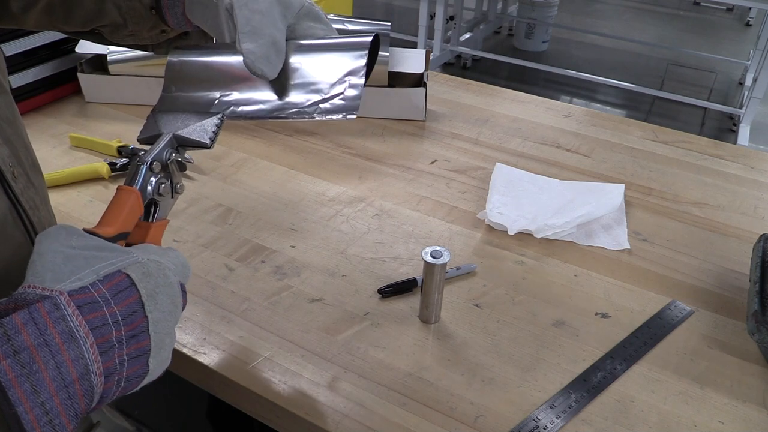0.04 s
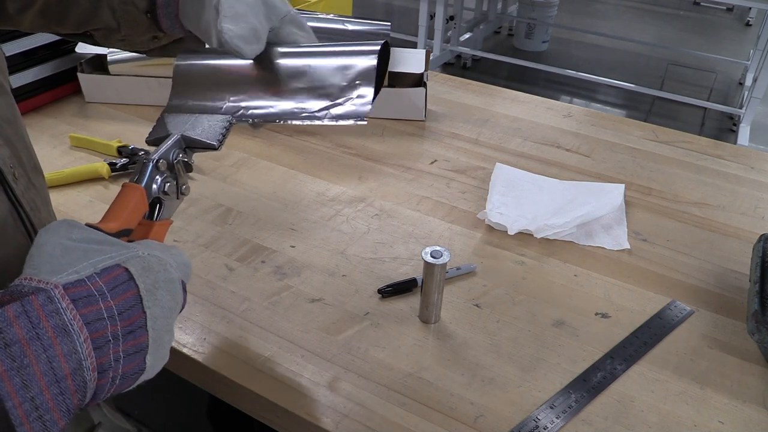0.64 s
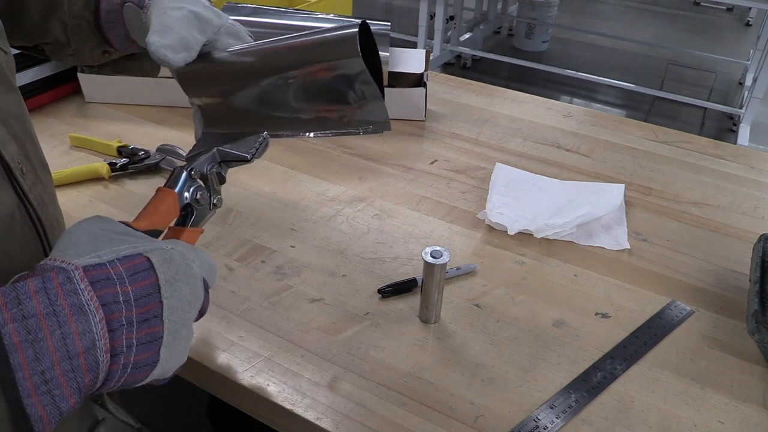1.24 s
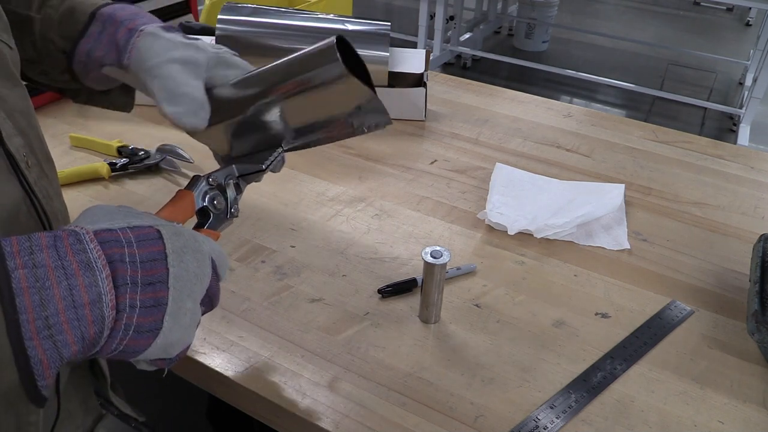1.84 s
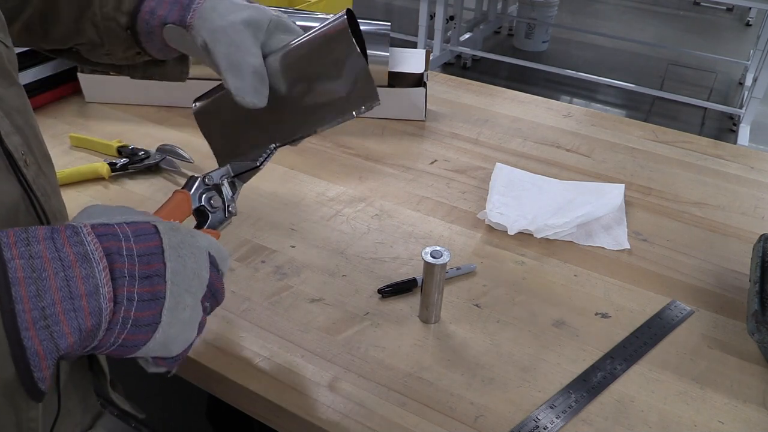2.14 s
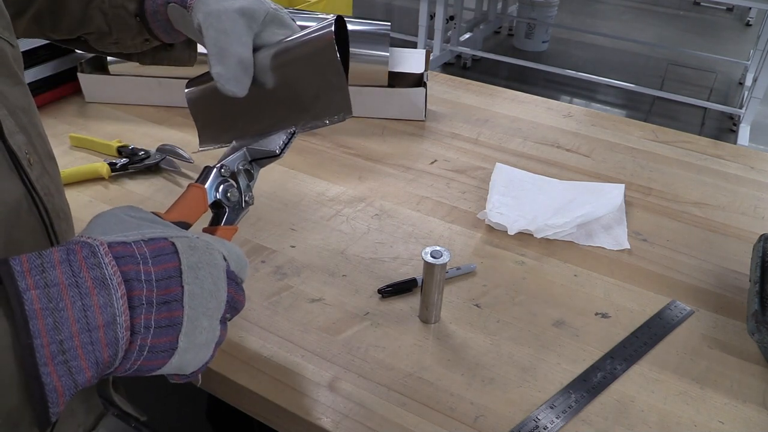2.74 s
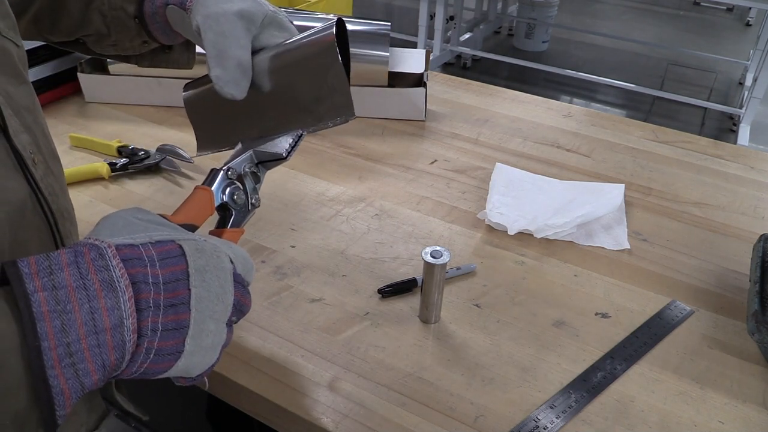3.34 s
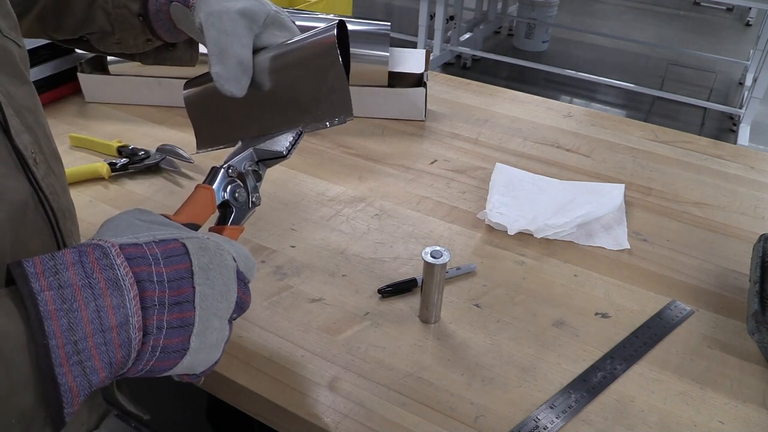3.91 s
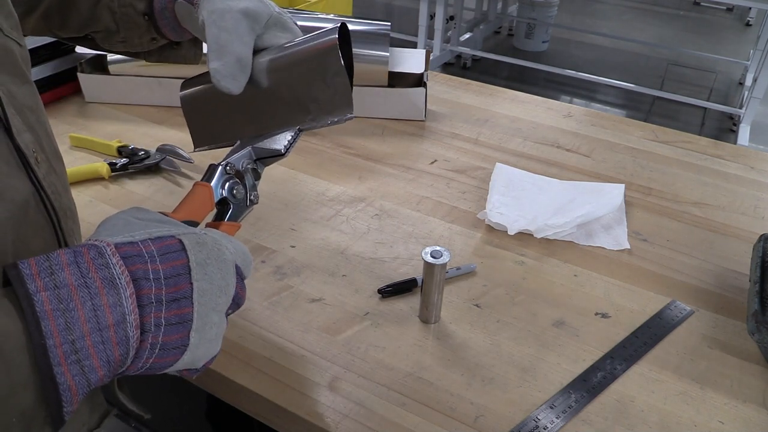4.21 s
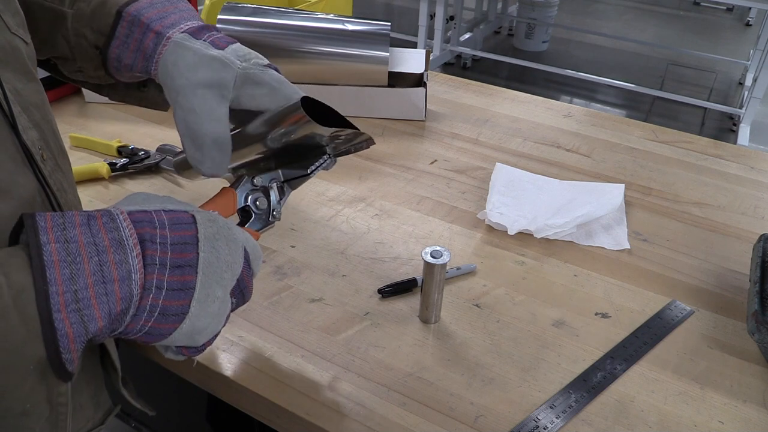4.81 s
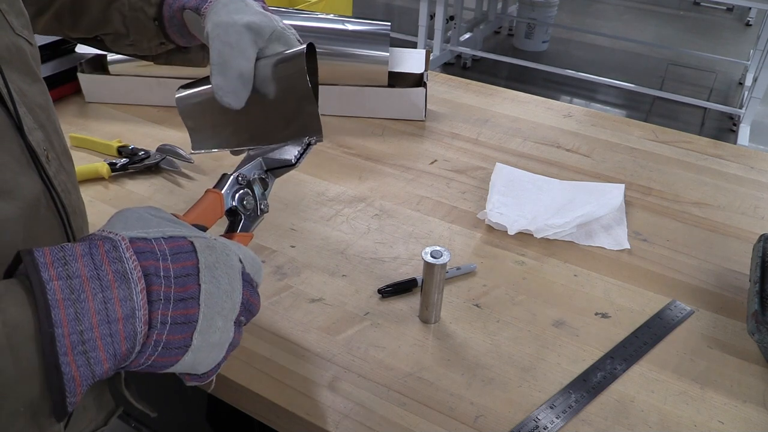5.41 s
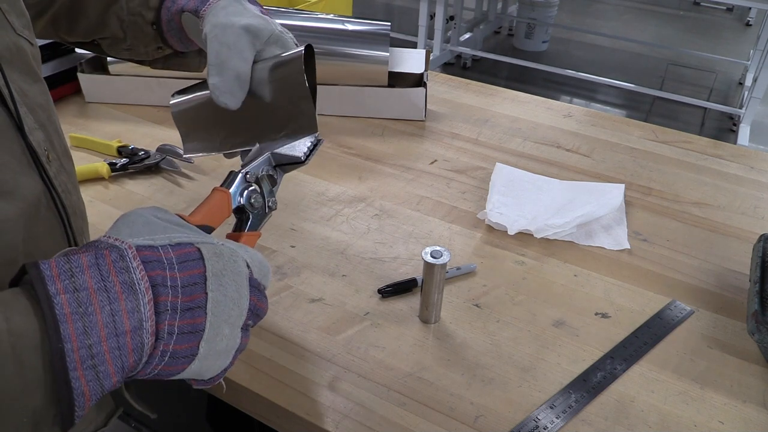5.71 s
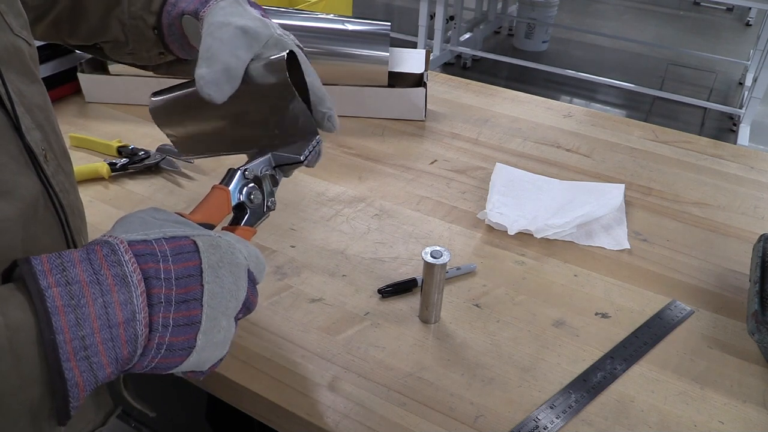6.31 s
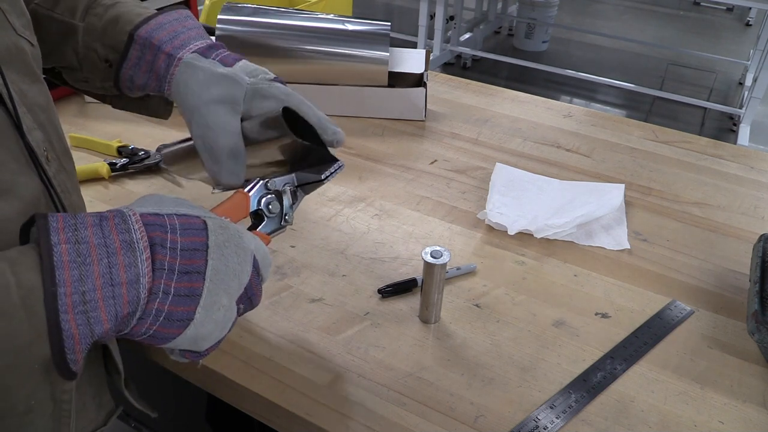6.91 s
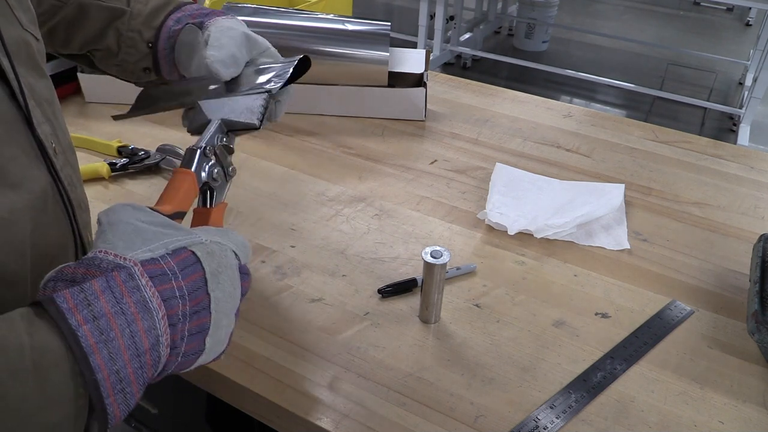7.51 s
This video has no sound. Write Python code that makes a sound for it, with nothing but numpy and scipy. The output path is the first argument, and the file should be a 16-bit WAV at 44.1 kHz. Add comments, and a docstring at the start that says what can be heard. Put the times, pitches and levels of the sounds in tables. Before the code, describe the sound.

Irregular metallic snaps, crinkles and brief sliding hisses of thin foil being bent with pliers, with gloves rumbling softly in a quiet lab.

```python
"""Gloved hands fold the edge of a thin steel foil pouch with flat-jawed pliers in a large lab. From the start,
the ventilation hums, sleeves and gloves rumble, and the held foil crinkles faintly. At 0.4 s the foil begins to
buckle in short, ringing snaps; some hard ones jolt the pliers with a thud. From 2.3 s a glove slides over the
foil with a soft hiss; after a loud double snap at 2.5 s, the snaps pause. They run again from 3.4 s to 7.2 s,
with more sliding around 5.4 s. It is almost mono."""
import sys
import numpy as np
from scipy import signal
from scipy.fft import rfft, irfft, next_fast_len
from scipy.io import wavfile
from scipy.ndimage import map_coordinates

SR = 44100
rng = np.random.default_rng(int(sys.argv[2]) if len(sys.argv) > 2 else 0)


def to_wav(sig):
    """Store sig (one row per channel, or 1-D mono) as 16-bit WAV at the path in sys.argv[1].

    Samples outside -1..1 are clipped; the rate is SR.
    """
    pcm = np.clip(np.atleast_2d(sig), -1, 1) * 32767
    pcm = np.round(pcm).astype(np.int16)
    wavfile.write(sys.argv[1], SR, pcm.T)  # frames by channels


N = 332955
TIME = np.arange(N) / SR

# The tone colour of the whole foil sheet, weak below 800 Hz. Columns: frequency_hz, relative_db
FOIL_COLOUR = [(100, -41), (300, -18.5), (500, -17), (740, -10), (920, 7), (1100, 13), (1450, 7),
               (1900, 1.5), (3700, 0.5), (5600, -9.5), (7400, -19.5), (9800, -28.5), (12000, -36.5),
               (15000, -43.5)]


def from_db(db):
    """Turn decibels into a number to multiply a sound by."""
    return 10 ** (np.asarray(db) / 20)


def rms_one(x):
    """Scale a sound so that its average level (rms) is 1."""
    return x / np.sqrt(np.mean(x ** 2) + 1e-20)


def energy_one(x):
    """Scale a sound so that its total energy is 1."""
    return x / np.sqrt(np.sum(x ** 2) + 1e-20)


def at_hz(points, hz):
    """Look up a tone colour in dB, joining its points smoothly on an octave scale."""
    knots, levels = np.transpose(points)
    return np.interp(np.log(hz), np.log(knots), levels)


def coloured(x, db_at):
    """Turn each frequency up or down by db_at(hz)."""
    size = 2 * next_fast_len(len(x) // 2 + 2048)
    hz = np.maximum(np.arange(size // 2 + 1) * SR / size, 1)
    cepstrum = irfft(np.log(from_db(db_at(hz))))
    # minimum phase: the filter rings only after a sound, never before it
    cepstrum[1:size // 2] *= 2
    cepstrum[size // 2 + 1:] = 0
    return irfft(rfft(x, size) * np.exp(rfft(cepstrum)))[:len(x)]


def noise(colour):
    """Steady noise with the given tone colour and an average level of 1."""
    return rms_one(coloured(rng.standard_normal(N), lambda hz: at_hz(colour, hz)))


def drift(turns_per_s):
    """A value that wanders at random around 0, mostly within 1 either way."""
    return np.interp(TIME * turns_per_s, np.arange(4096), rng.standard_normal(4096))


def fade(t, ring_s):
    """Die away by 60 dB in ring_s seconds."""
    return np.exp(-np.log(1000) * t / max(ring_s, 1e-3))


def keep_band(x, hz, kind):
    """Let through the "low" side of hz, the "high" side, or the "band" between two frequencies."""
    return signal.sosfilt(signal.butter(2, hz, kind, fs=SR, output="sos"), x)


def effort():
    """Busier hands make the rumble, rustle and crinkling louder."""
    # How hard the hands work. Columns: time_s, gain_db
    hand_work = [(0, -5), (1.1, 2.5), (1.85, -2), (2.4, 4.5), (3.2, -5.5), (3.8, -2), (4.45, 0),
                 (5.0, -5.5), (5.4, 3), (7.1, 0.5), (7.55, -1.5)]
    return from_db(np.interp(TIME, *np.transpose(hand_work)))


def hand_rumble(base_db=-59, lumpy_db=3.0):
    """Cloth and leather never quite rest; their lumpy rumble swells as the hands shift or are jolted."""
    # Swells as a glove or sleeve shifts. The one at 0.94 s is instead the low thump of the hard snap
    # at 0.95 s jolting the pliers and hand. Columns: middle_s, level_db, length_s
    swells = [(0.292, -54, 0.029), (0.64, -54.5, .1), (0.94, -44.5, 0.042), (1.256, -57, 0.37),
              (1.602, -51, 0.067), (2.017, -52, 0.06), (2.17, -53, 0.051), (2.397, -49.5, 0.071),
              (2.58, -55.5, 0.27), (3.39, -52.5, 0.027), (3.51, -53.5, 0.13), (4.091, -56.5, 0.25),
              (4.488, -50, 0.07), (4.748, -56, 0.3), (5.115, -50, 0.09), (5.466, -49.5, 0.088),
              (6.082, -59, 0.2), (6.683, -54.5, 0.092), (6.924, -52, 0.17), (7.136, -44, 0.036),
              (7.25, -52, 0.11)]
    # The tone colour of the rumble. Columns: frequency_hz, relative_db
    rumble_colour = [(20, -31), (40, -28.5), (62, -19), (110, -5), (160, -5.5), (210, 4), (300, -2),
                     (480, -10), (700, -9), (1500, -33), (8000, -70)]
    swell_power = sum(from_db(db) ** 2 * np.exp(-np.minimum((2 * (TIME - middle_s) / length_s) ** 2, 20))
                      for middle_s, db, length_s in swells)
    level = np.sqrt((from_db(base_db) * effort()) ** 2 + swell_power)
    return noise(rumble_colour) * level * from_db(lumpy_db * drift(30))


def air_and_rustle(air_db=-61.5, rustle_db=-60, lumpy_db=1):
    """Steady air from the ventilation and the light rustle of gloves share one soft rushing noise."""
    # The tone colour of both. Columns: frequency_hz, relative_db
    air_colour = [(200, -2.5), (500, -4.5), (620, 9.5), (760, -0.5), (950, 6.5), (1500, -2), (2200, -8.5),
                  (3500, -16.5), (5000, -27), (6500, -34.5), (9000, -56), (15000, -68.5)]
    rustle = effort() * from_db(rustle_db + lumpy_db * drift(17))
    return noise(air_colour) * np.hypot(from_db(air_db), rustle)


def fan_hum(waver_radians=0.94):
    """The ventilation fan hums with three slightly wavering tones."""
    # The fan's tones. Columns: pitch_hz, level_db
    tones = [(220.7, -69.5), (393, -68.5), (603, -72)]
    return sum(from_db(db) * np.sqrt(2) * np.sin(2 * np.pi * hz * TIME + waver_radians * drift(25))
               for hz, db in tones)


def sheet_ring(t, ring_s, low_hz=1800, top_hz=7500, spread_s=0.00031):
    """Bending waves spread over the sheet and ring at countless pitches; the low ones last longer."""
    # Columns: edge_hz, kind, multiple of ring_s
    bands = [(low_hz, "low", 1.376), ([low_hz, top_hz], "band", 0.76), (top_hz, "high", 0.25)]
    ring = sum(keep_band(rng.standard_normal(len(t)), hz, kind) * fade(t, ring_s * life)
               for hz, kind, life in bands)
    return energy_one(ring * (1 - np.exp(-t / spread_s)))


def treble_edge(hz, edge_hz, steepness=14):
    """A soft contact makes almost no sound above edge_hz; this gives the drop in dB."""
    return -10 * np.log10(1 + (hz / edge_hz) ** steepness)


def crinkle(ticks_per_s=18, base_db=-68.5, uneven_db=3.5, ring_s=0.11, edge_hz=4500, size=6000):
    """The sheet gives tiny random ticks as the fingers flex it."""
    strengths = from_db(uneven_db * np.clip(rng.standard_normal(N), -2, 2))
    ticks = strengths * (rng.random(N) < ticks_per_s / SR)
    ringing = signal.fftconvolve(ticks, sheet_ring(np.arange(size) / SR, ring_s))[:N]
    ringing = coloured(ringing, lambda hz: at_hz(FOIL_COLOUR, hz) + treble_edge(hz, edge_hz))
    return from_db(base_db) * effort() * rms_one(ringing)


def buckle(run_ms, slips_per_s=2500, uneven_db=5.0, first_db=1.0, weaken_db=2.0, size=4096):
    """Foil gives way in a quick string of uneven slips, which weaken as the stress is spent."""
    chance, strength, sign = rng.random(size), rng.standard_normal(size), rng.choice([-1, 1], size)
    count = int(np.clip(run_ms * SR / 1000, 2, size))
    slips = chance[:count] < slips_per_s / SR
    slips[[0, -1]] = True
    slip_db = uneven_db * strength[:count] - weaken_db * np.linspace(0, 1, count)
    slip_db[0] = first_db
    return slips * sign[:count] * from_db(slip_db)


def bent(x, glide):
    """Bending the sheet shifts all its tones together, by `glide` times their pitch each second."""
    t = np.arange(len(x)) / SR
    return map_coordinates(x, [SR * np.abs(t + glide * t ** 2 / 2)], order=3)


def snaps(panel_octaves=0.12, crack=0.42, glide=0.74, gain_db=26.5, size=9000):
    """Each snap reshapes the sheet, so it rings afresh, and one panel (a patch of foil) stands out."""
    # The foil's snaps. Brightness is treble over bass; a sharp crease has a high edge, a soft bulge low.
    # Columns: start_s, relative_db, run_ms, ring_s, pitch_hz, bright_db, edge_hz
    snap_list = [(0.394, -51.5, 2.3, 0.045, 6440, 16, 6660), (0.465, -41.5, 2.74, 0.051, 4300, 11.5, 4350),
                 (0.569, -38, 1.35, 0.11, 2430, 9, 4260), (0.692, -33.5, 4, 0.12, 2750, 15, 5400),
                 (0.808, -29.5, 19.5, 0.19, 940, -6, 4900), (0.871, -18, 13.6, 0.18, 885, 1.5, 7400),
                 (0.881, -20.5, 7.4, 0.11, 2100, 4.5, 6000), (0.932, -29.0, 3.8, 0.087, 2170, 5, 5300),
                 (0.95, -16.5, 4, 0.076, 2400, 1, 8600), (0.979, -20, 18.7, 0.13, 856, -2, 7150),
                 (1.106, -36, 26.6, 0.15, 2390, 15, 6600), (1.179, -34, 4.3, 0.087, 2930, 12.5, 5800),
                 (1.217, -37, 1.1, 0.13, 858, -20, 3500), (1.388, -29, 8.7, 0.13, 930, -9, 13000),
                 (1.397, -20.5, 8.9, 0.13, 880, 3.5, 11700), (1.888, -43.5, 3.5, 0.21, 970, -24.5, 15000),
                 (1.991, -26, 2.75, 0.13, 3620, -6.5, 6300), (2.03, -34.5, 4.4, 0.113, 970, -20, 3500),
                 (2.067, -28, 10, 0.14, 2000, 11, 7500), (2.08, -19.5, 7.3, 0.12, 980, -1.5, 6000),
                 (2.142, -33, 5.1, 0.075, 1060, -9.5, 3500), (2.25, -33.5, 7.7, 0.13, 1130, -8, 10300),
                 (2.428, -40.5, 4.6, 0.19, 1154, -9, 6340), (2.529, -19, 2.5, 0.1, 1500, 2, 6700),
                 (2.536, -18.5, 4.5, 0.069, 2020, 12, 10900), (3.412, -26.5, 27.9, 0.17, 1400, 5.5, 8300),
                 (3.749, -35, 1.3, 0.067, 1275, -4.5, 5000), (3.785, -44, 3.0, 0.11, 4060, 5, 5400),
                 (3.859, -41, 3.4, 0.088, 2730, -4.5, 4600), (4.022, -30.5, 1, 0.18, 2890, 7.5, 10500),
                 (4.026, -21, 1.75, 0.064, 1520, 12, 10400), (4.097, -49, 2, 0.053, 5860, 30, 8400),
                 (4.225, -31.5, 2, 0.085, 3750, -8.5, 4300), (4.27, -21, 5.7, 0.21, 1000, 5.5, 7700),
                 (4.284, -18, 9.5, 0.18, 1120, -2.5, 4800), (4.376, -31.5, 8.4, 0.066, 1610, 2.5, 4800),
                 (4.407, -33, 5, 0.13, 980, -12, 5000), (4.546, -36, 3, 0.091, 2480, 15.5, 6000),
                 (4.599, -22.5, 20.5, 0.17, 1650, 8, 11000), (4.688, -38, 3.1, 0.092, 945, -11, 5100),
                 (4.719, -18.5, 4.1, 0.11, 1106, 2.5, 7500), (4.73, -15.5, 4, 0.13, 1080, -0.5, 7660),
                 (5.057, -38.5, 2.74, 0.11, 5220, 3, 5600), (5.093, -35.5, 15.5, 0.1, 2290, 4, 5400),
                 (5.139, -17, 7.7, 0.12, 2320, 6.5, 9400), (5.223, -28.5, 8.4, 0.13, 1285, 4.5, 8100),
                 (5.363, -35, 1.9, 0.16, 3560, 20, 6550), (5.537, -43.5, 1.5, 0.046, 1320, -26, 9000),
                 (5.633, -26.5, 20.3, 0.12, 1310, 7, 8800), (5.797, -41.5, 6.9, 0.079, 1410, 12, 4300),
                 (5.898, -31, 2.95, 0.066, 2480, 9.5, 5730), (6.073, -33.0, 21.7, 0.14, 1100, 7, 6000),
                 (6.19, -25, 33.7, 0.2, 1028, 1, 9300), (6.314, -23, 6.6, 0.098, 2340, 8, 6300),
                 (6.403, -23.5, 16.8, 0.098, 1330, 4.5, 5500), (6.503, -26.5, 36, 0.19, 2300, 1.5, 15000),
                 (6.573, -30.5, 0.96, 0.11, 2250, 8.5, 5100), (6.609, -31.5, 3.8, 0.11, 3630, 8, 6200),
                 (6.625, -29, 7.1, 0.078, 1320, 13.5, 16000), (6.637, -16, 4.5, 0.15, 1070, 3.5, 11000),
                 (6.783, -28, 2.3, 0.09, 2550, 14.5, 6400), (6.934, -19.5, 3.5, 0.14, 2250, 4, 8500),
                 (7.057, -24.5, 26, 0.11, 2230, 7.5, 11000), (7.103, -37, 14, 0.17, 870, 15, 5500),
                 (7.205, -26.0, 6.5, 0.088, 1130, 2, 8600), (7.221, -25, 19.5, 0.094, 1283, 14.5, 11100)]
    # A panel's own tone and one overtone. Columns: pitch_multiple, boost_share
    panel_tones = [(1, 1), (3.15, 0.17)]
    out, t = np.zeros(N + size), np.arange(size) / SR
    for start_s, level_db, run_ms, ring_s, pitch_hz, bright_db, edge_hz in snap_list:
        # a small tick stays within its own panel, so its pitch is clearer
        boost_db = np.interp(level_db, [-38, -22], [11.5, 6.0])

        def colour_db(hz):
            """The sheet's tone colour, shaped by this snap's panel and sharpness."""
            db = at_hz(FOIL_COLOUR, hz) + at_hz([(1300, 0), (6500, bright_db)], hz)
            for multiple, share in panel_tones:
                distance = np.log2(hz / (multiple * pitch_hz)) / panel_octaves
                db += boost_db * share * np.exp(-.5 * np.minimum(distance ** 2, 20))
            return db + treble_edge(hz, edge_hz)

        # both walls of the pouch buckle; each slip is heard as a crack and as ringing
        struck = sum(signal.fftconvolve(sheet_ring(t, ring_s) + crack * (t == 0), buckle(run_ms))[:size]
                     for wall in ("front", "back"))
        snap = coloured(bent(struck, glide * rng.uniform(-1, 1)), colour_db)
        start = round(start_s * SR)
        out[start:start + size] += from_db(level_db + gain_db) * energy_one(snap)
    return out[:N]


def jolts(ring_s=0.3, rise_s=0.00091, gain_db=-4.0):
    """Some hard snaps send a dull, short thud through the pliers and the hand."""
    # The thuds. Columns: start_s, relative_db
    thuds = [(0.877, -53), (0.949, -31.5), (2.538, -59), (4.026, -38.5), (4.284, -34.5), (6.639, -47.5)]
    # The tone colour of a thud. Columns: frequency_hz, relative_db
    thud_colour = [(50, -26), (130, -8.5), (350, 2.5), (650, 17.5), (1200, -19), (3000, -46.5),
                   (9000, -78.5)]
    push = sum(from_db(db) * np.clip((TIME - start_s) / rise_s, 0, 1)
               * fade(np.abs(TIME - start_s), ring_s) for start_s, db in thuds)
    return from_db(gain_db) * push * noise(thud_colour)


def slides(catches_per_s=1300, uneven_db=5.5, ring_s=0.044, grit=0.46, glide=0.66,
           swell_db=31, gain_db=-2.5, size=14000):
    """A gloved hand slides over the foil and catches on it many times; each catch rings the flexing sheet: a
    hiss."""
    # Strokes of the glove sliding over the foil. Columns: peak_s, relative_db, swell_s, release_s, edge_hz
    strokes = [(2.312, -43, 0.059, 0.095, 11300), (2.695, -61, .03, 0.054, 6570),
               (3.078, -72, 0.034, 0.035, 8000), (5.251, -41.5, .1, 0.1, 9000),
               (5.392, -49.5, 0.095, 0.068, 9000), (5.63, -43, 0.042, 0.066, 8800)]
    # The tone colour of sliding. Columns: frequency_hz, relative_db
    slide_colour = [(900, -18), (2000, -7.5), (4000, 4), (6200, 5), (7500, -3.5), (9400, -7),
                    (11500, -17.5), (15000, -28.5)]
    out, t = np.zeros(N), np.arange(size) / SR
    for peak_s, level_db, swell_s, release_s, edge_hz in strokes:
        signs = rng.choice([-1, 1], size)
        strengths = from_db(uneven_db * np.clip(rng.standard_normal(size), -2, 2))
        catches = signs * strengths * (rng.random(size) < catches_per_s / SR)
        ringing = signal.fftconvolve(catches, sheet_ring(t, ring_s) + grit * (t == 0))[:size]
        ringing = bent(ringing, glide * rng.choice([-1, 1]))
        hiss = rms_one(coloured(ringing, lambda hz: at_hz(slide_colour, hz) + treble_edge(hz, edge_hz)))
        from_peak = np.maximum(1 - t / swell_s, (t - swell_s) / release_s)
        push_db = -swell_db * np.clip(from_peak, 0, 2) ** 2
        start = round((peak_s - swell_s) * SR)
        out[start:start + size] += hiss * from_db(gain_db + level_db + push_db)
    return out


def lab_echoes(x, build_s=0.022, size=50000):
    """Sound bounces off the bench and racks, then lingers, faint and dull, in the large room."""
    # Columns: relative_db, ring_s, cutoff_hz
    near, far = (-21.0, 0.16, 6500), (-30.5, 3.2, 2500)
    t = np.arange(size) / SR
    tail = 0
    for db, ring_s, cutoff_hz in (near, far):
        echoes = energy_one(rng.standard_normal(size) * fade(t, ring_s) * (1 - np.exp(-t / build_s)) ** 2)
        tail = tail + from_db(db) * keep_band(echoes, cutoff_hz, "low")
    return signal.fftconvolve(x, tail)[:N]


def scene(width_db=-35.5, width_hz=7000):
    """The foil is straight ahead; left and right differ only in its treble."""
    foil = snaps() + slides() + crinkle()
    middle = foil + lab_echoes(foil) + jolts() + hand_rumble() + air_and_rustle() + fan_hum()
    side = from_db(width_db) * keep_band(foil, width_hz, "high")
    return middle + side * np.array([[1], [-1]])


def record(dry, hiss_db=-91, cutoff_hz=15400):
    """Each of two microphones adds its own faint hiss, then the highest treble is cut."""
    # The tone colour of microphone hiss. Columns: frequency_hz, relative_db
    hiss_colour = [(3000, -19.5), (6000, 3), (9000, 3), (12500, 0.5), (15000, -13.5)]
    hiss = from_db(hiss_db) * np.array([noise(hiss_colour), noise(hiss_colour)])
    return signal.sosfilt(signal.ellip(10, .1, 80, cutoff_hz, fs=SR, output="sos"), dry + hiss)


dry = scene()
out = record(dry)
to_wav(out)
```